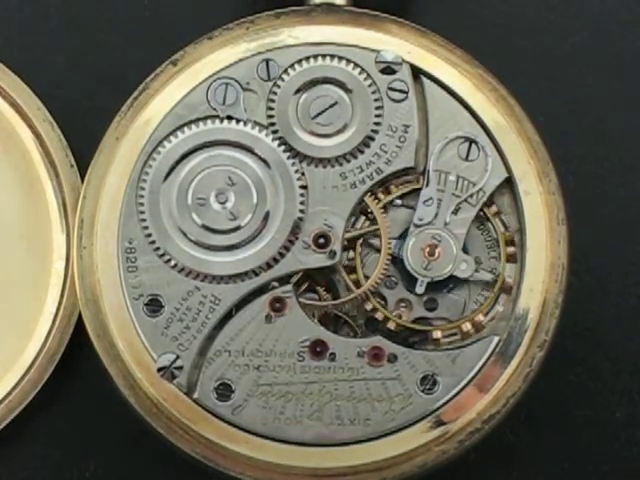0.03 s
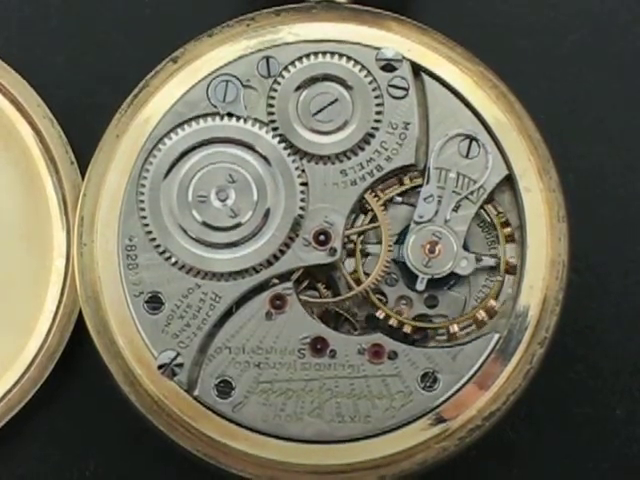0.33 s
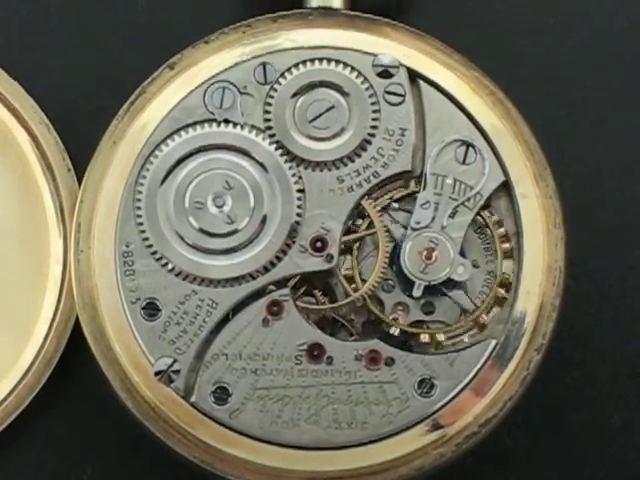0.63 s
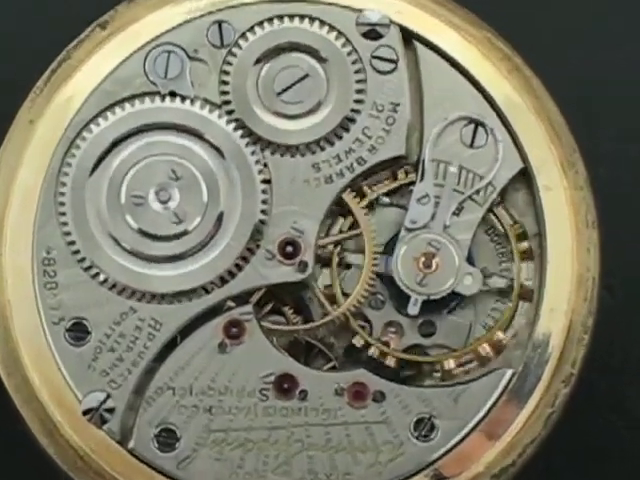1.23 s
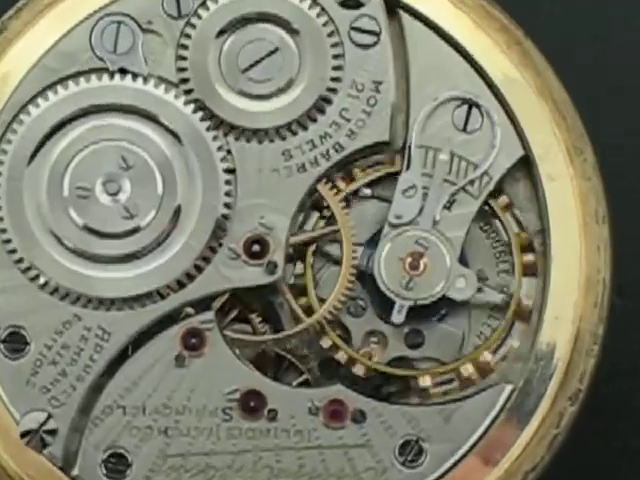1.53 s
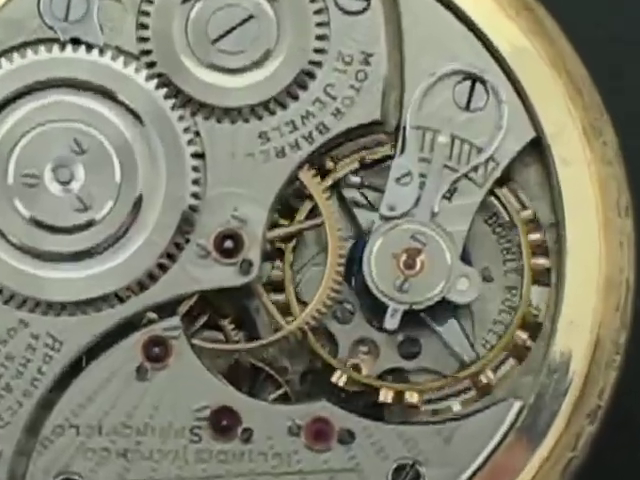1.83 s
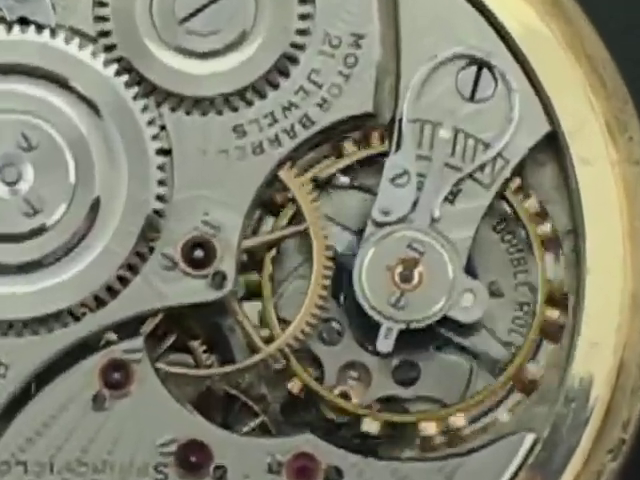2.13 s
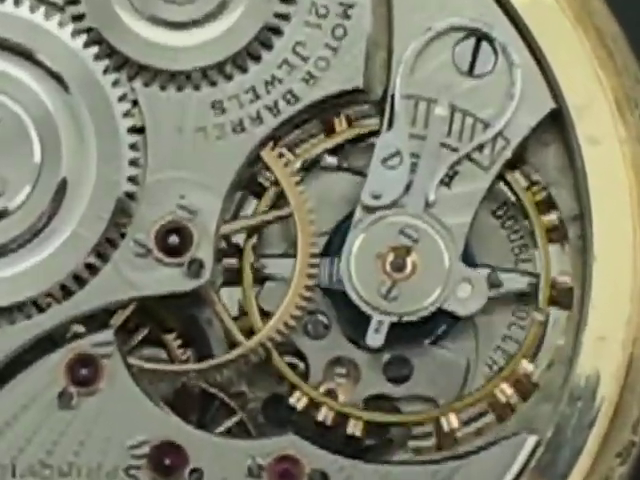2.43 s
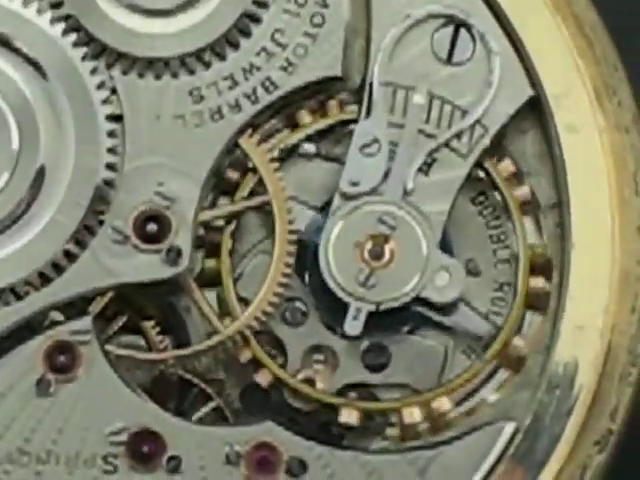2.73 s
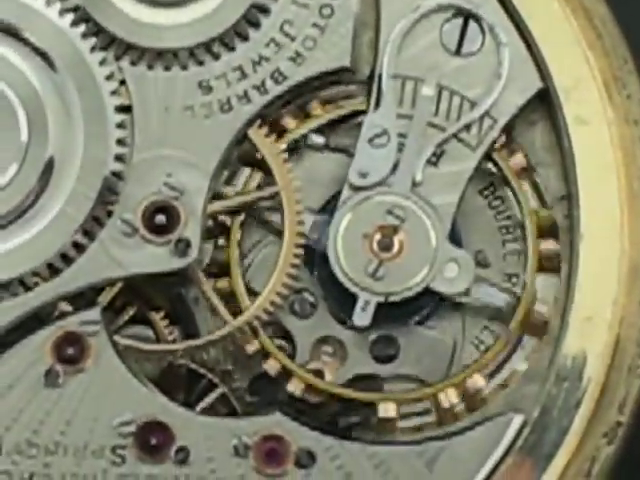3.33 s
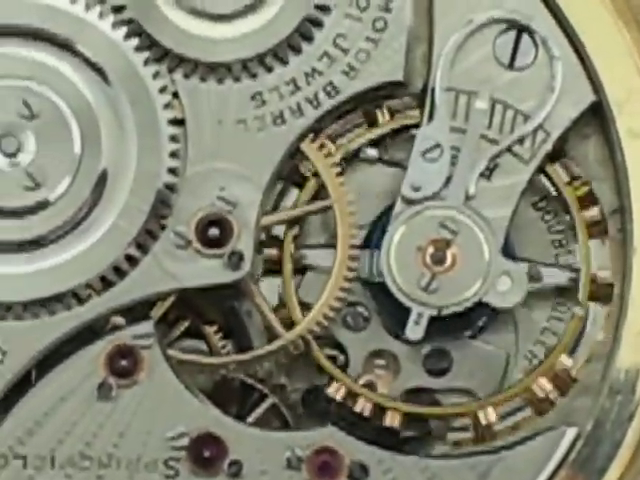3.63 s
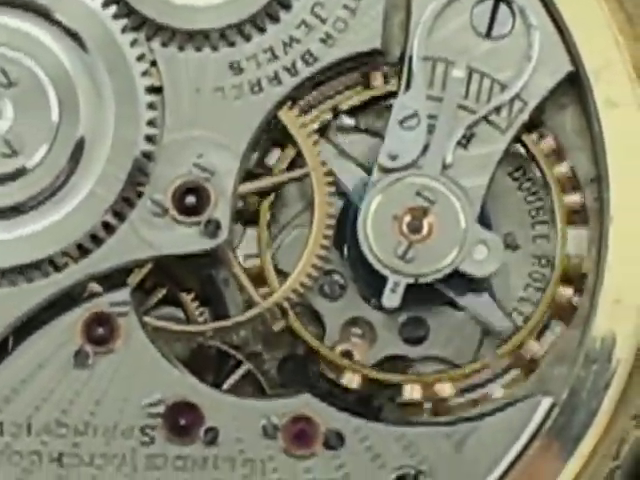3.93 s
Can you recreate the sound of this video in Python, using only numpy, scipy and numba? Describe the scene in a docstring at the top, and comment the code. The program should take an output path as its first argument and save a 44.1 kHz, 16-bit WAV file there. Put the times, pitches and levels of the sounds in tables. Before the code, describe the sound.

Steady fan noise and electrical hum fill a quiet room, heard through a camera microphone with slight hiss and a thin whine. Two hard handling clicks briefly duck the sound, then fingers lightly rub and tap the camera.

```python
"""A fan drones in a quiet room: throbbing air noise, wavering motor tones and mains hum.
It is heard through a camera whose gain control has turned it far up. Fingers rub and click on the
camera body, which rings briefly; two hard clicks slam the gain down and the drone swells back.
The camera adds a thin whine and its own hiss, and there is one faint pop."""
import sys
import numpy as np
from scipy import signal
from scipy.fft import rfft, irfft
from scipy.io import wavfile
from numba import njit

SR = 44100
rng = np.random.default_rng(int(sys.argv[2]) if len(sys.argv) > 2 else 0)


def generate_wav(signal):
    """Clip the signal to [-1, 1] and save it as 16-bit WAV at the path in sys.argv[1]."""
    frames = np.transpose(np.atleast_2d(signal))
    scaled = np.clip(frames, -1, 1) * 32767
    pcm = np.round(scaled).astype(np.int16)
    wavfile.write(sys.argv[1], SR, pcm)


N = 176400  # 4 seconds

# How strong the camera's hiss is from low to high: frequency_hz, relative_db
HISS_SPECTRUM = [(20, -18), (300, 9.5), (1500, -4), (3500, -4), (4600, -4), (5300, -6.5), (5800, -14)]
# How loud the camera's whine is over time: time_s, level_db
WHINE_LEVELS = [(0, -50), (.6, -49), (1.1, -56), (1.3, -48), (2.1, -46), (2.7, -48), (3.2, -51),
                (3.5, -48.5), (3.62, -46), (4, -45.5)]
# Fingers rubbing the camera: start_s, length_s, level_db, centre_hz
FINGER_RUBS = [(0.498, 0.079, -42, 2570), (0.602, 0.065, -39, 2470), (2.164, 0.045, -26, 2300),
               (3.54, 0.074, -40, 1920), (3.677, 0.34, -35, 1080)]
# Clicks on the camera: start_s, peak_db, centre_hz
FINGER_CLICKS = [(0.6625, 15.5, 1574), (0.6625, 9.5, 4220), (2.1788, -16, 2230), (2.182, -9.5, 1700),
                 (2.1843, -5.5, 1900), (2.1879, 6.5, 4300), (2.1927, 21, 1900), (3.347, -28.5, 2900),
                 (3.567, -25.5, 2800), (3.5784, -16.5, 2850), (3.761, -19, 2950), (3.778, -18.5, 3000),
                 (3.801, -20, 2900), (3.82, -28.5, 1970), (3.872, -22.5, 2400), (3.922, -27, 2600)]
# Tones the camera body rings with: pitch_hz, relative_db, ring_s (time to fade by 60 dB)
BODY_TONES = [(1080, -4.5, 0.01), (1441, -0.5, 0.018), (1824, -0.5, .012), (2310, -33.5, .12),
              (2480, -5.5, 0.015), (2898, -2.5, 0.015), (3806, -1, 0.008), (4140, 0, 0.0098),
              (5000, -13, 0.0049), (4900, -5.5, 0.002)]
# How strong the fan's air noise is from low to high: frequency_hz, relative_db
AIR_SPECTRUM = [(12, -61), (20, -33), (38, -26), (59, -26.5), (107, -6), (156, -1.5), (206, -5), (243, -1),
                (280, -6.5), (355, -3.5), (419, -10.5), (494, -5.5), (543, -1), (755, -16.5), (870, -6.5),
                (956, -11.5), (1050, -10.5), (1330, -25), (1720, -25), (2080, -32), (2290, -31),
                (3840, -36.5), (4420, -40), (4750, -42), (5600, -45), (7280, -74), (12300, -120)]
# Tones of the fan's motor: pitch_hz, level_db
MOTOR_TONES = [(142, -37), (167, -32.5), (317, -37), (409, -51), (531, -34), (545, -39), (576, -39),
               (628, -38.5), (674, -41), (695, -46), (888, -42.5), (1038, -40), (1084, -44.5), (1270, -55)]
# Mains hum at 1, 2, 3... times HUM_HZ: level_db
HUM_LEVELS = [-33.5, -54, -34, -41.5, -42]

HUM_HZ, THROB_HZ, AIR_DB = 120, 50.26, -21.5
CEILING_DB, HISS_DB = -11, -52.5


def amp(db):
    """Turns decibels into a number to multiply by."""
    return 10 ** (np.asarray(db) / 20)


def evened(x):
    """Scales x to an average strength (rms) of 1."""
    return x / np.sqrt(np.mean(x ** 2) + 1e-20)


def add(mix, start_s, sound):
    """Mixes a sound in at its start time."""
    part = mix[round(start_s * SR):][:len(sound)]
    part += sound[:len(part)]


def bell(hz, centre_hz, octaves):
    """A gain that falls away on both sides of a centre."""
    return np.exp(-.5 * (np.log2((hz + 1) / centre_hz) / octaves) ** 2)


def banded(x, centre_hz, octaves):
    """Keeps the frequencies near a centre, at strength 1."""
    hz = np.fft.rfftfreq(len(x), 1 / SR)
    return evened(irfft(rfft(x) * bell(hz, centre_hz, octaves), len(x)))


def shaped_noise(spectrum):
    """Noise with the lows and highs of a table, at strength 1."""
    table_hz, table_db = np.transpose(spectrum)
    hz = np.fft.rfftfreq(N, 1 / SR)
    db = np.interp(np.log(hz + 1), np.log(table_hz), table_db)
    return evened(irfft(rfft(rng.standard_normal(N)) * amp(db), N))


def drift(rate_hz):
    """A random wander of strength 1; a higher rate wanders faster."""
    hz = np.fft.rfftfreq(N, 1 / SR)
    return evened(irfft(rfft(rng.standard_normal(N)) * np.exp(-(hz / rate_hz) ** 2), N))


def tone(hz):
    """A pure tone of strength 1 that follows a pitch."""
    cycles = np.cumsum(hz * np.ones(N)) / SR + rng.random()
    return np.sqrt(2) * np.sin(2 * np.pi * cycles)


@njit
def gain_cut(over_db):
    """Decibels the camera turns down: jumps up at a peak over the ceiling, then eases back."""
    attack_s, recover_db_per_s, recover_s = .00008, 21.5, 1
    attack = 1 - np.exp(-1 / (attack_s * SR))
    out, cut = np.zeros(len(over_db)), 0.
    for i in range(len(over_db)):
        if over_db[i] > cut:
            cut += attack * (over_db[i] - cut)
        else:  # a steady return, plus extra speed when the cut is deep
            cut = max(cut - (recover_db_per_s + cut / recover_s) / SR, 0.)
        out[i] = cut
    return out


def faint_pop():
    """A soft low bump with a thin snap at its front."""
    out, t = np.zeros(N), np.arange(SR // 5) / SR
    rise_s, fade_s = .00049, .0059
    bump = amp(-24) * (1 - t / fade_s) * np.exp(-t / fade_s) * (1 - np.exp(-t / rise_s))
    snap = amp(-21.5) * np.exp(-t / .00006)
    add(out, start_s=1.4215, sound=bump + snap)
    return out


def camera_whine(pitch_hz=4287):
    """A thin tone from inside the camera that grows and fades a little."""
    time_s, level_db = np.transpose(WHINE_LEVELS)
    gain = amp(np.interp(np.arange(N) / SR, time_s, level_db))
    return gain * tone(pitch_hz + 1.9 * drift(4.6))


def finger_rub(length_s, level_db, centre_hz, grain_db=3.5):
    """Skin drags over plastic and makes a grainy noise that fades in and out."""
    size = round(length_s * SR)
    grains = rng.standard_normal(N) * amp(grain_db * drift(400))
    fade = signal.windows.tukey(size, .5)
    return amp(level_db) * banded(grains[:size], centre_hz, octaves=.64) * fade


def finger_click(peak_db, centre_hz, octaves=.51, rise_s=.0003, crack_s=.0016):
    """A short crack sets the camera body ringing with tones that die quickly."""
    t = np.arange(SR // 5) / SR
    ring = np.zeros(len(t))
    for k, (hz, db, ring_s) in enumerate(BODY_TONES):
        strength = amp(db - 60 * t / ring_s) * bell(hz, centre_hz, octaves)
        direction = (-1) ** k  # every other tone starts the opposite way
        ring += direction * strength * np.sin(2 * np.pi * hz * rng.uniform(1.0, 1.02) * t)
    crack = .64 * banded(rng.standard_normal(len(t)), centre_hz, octaves) * np.exp(-t / crack_s)
    sound = (ring + crack) * (1 - np.exp(-t / rise_s)) ** 2
    return amp(peak_db) * sound / abs(sound).max()


def handling():
    """Fingers click and rub on the camera, each at its listed time."""
    out = np.zeros(N)
    for start_s, peak_db, centre_hz in FINGER_CLICKS:
        add(out, start_s, finger_click(peak_db, centre_hz))
    for start_s, length_s, level_db, centre_hz in FINGER_RUBS:
        add(out, start_s, finger_rub(length_s, level_db, centre_hz))
    return out


def fan(waver_hz=1.997, flutter=.26):
    """Rushing air pulses with the fan and the mains, over wavering motor tones and a steady hum."""
    throb = .23 * tone(THROB_HZ + drift(3))
    buzz = .064 * tone(HUM_HZ)
    pulsing = 1 + (throb + buzz) / 2
    air = amp(AIR_DB) * evened(shaped_noise(AIR_SPECTRUM) * pulsing)
    motor = np.zeros(N)
    for hz, db in MOTOR_TONES:
        wavering = tone(hz + waver_hz * drift(13.4))
        motor += amp(db) * wavering * (1 + flutter * drift(5))
    hum = sum(amp(db) * tone(k * HUM_HZ + .61 * drift(3.4)) for k, db in enumerate(HUM_LEVELS, 1))
    return air + motor + hum


def scene():
    """Everything that reaches the microphone, in one channel."""
    return (fan() + camera_whine() + handling())[None]


def lowpass(x, hz):
    """Steeply cuts away everything above hz."""
    weights = signal.firwin(301, hz, window=("kaiser", 9), fs=SR)
    return signal.oaconvolve(x, weights[None], "same")


def record(dry):
    """The camera turns down at loud peaks, adds hiss and loses the highs; one pop comes on top."""
    treble_hz = 3500  # the gain control reacts more to sound above this
    sensed = dry[0] + np.gradient(dry[0]) * SR / (2 * np.pi * treble_hz)
    level_db = 20 * np.log10(abs(signal.hilbert(sensed)) + 1e-9)
    turned_down = dry * amp(-gain_cut(level_db - CEILING_DB))
    hiss = amp(HISS_DB) * shaped_noise(HISS_SPECTRUM)
    dulled = lowpass(turned_down + hiss, hz=5780)
    return lowpass(dulled + faint_pop(), hz=16000)


dry = scene()
out = record(dry)
generate_wav(out)
```